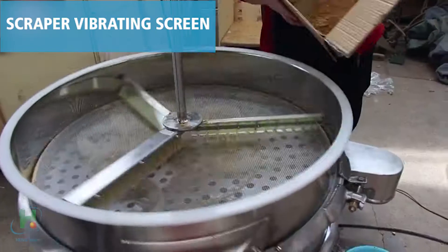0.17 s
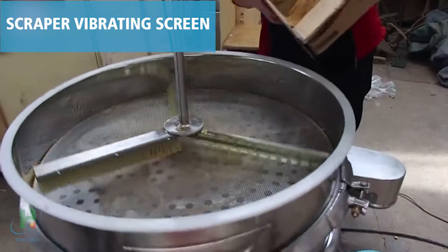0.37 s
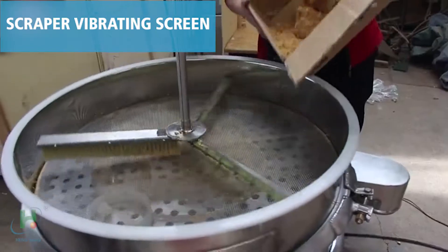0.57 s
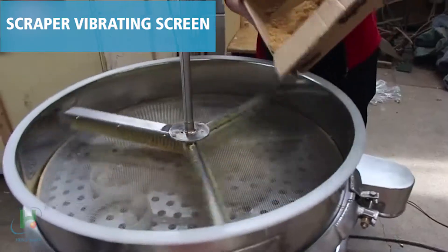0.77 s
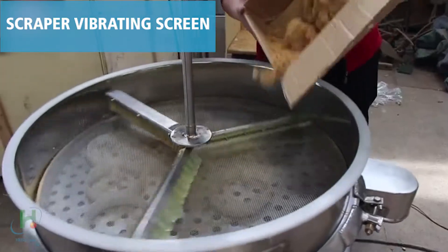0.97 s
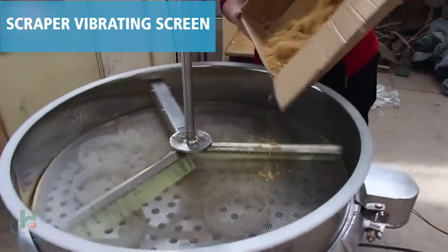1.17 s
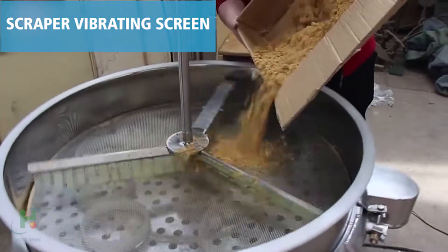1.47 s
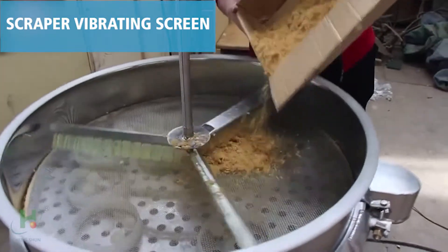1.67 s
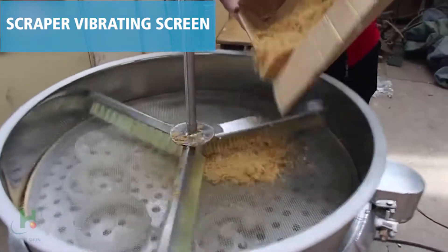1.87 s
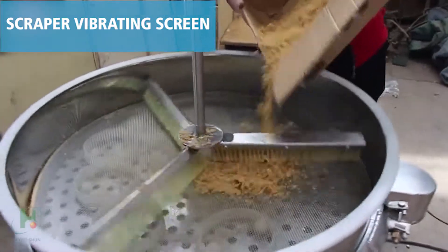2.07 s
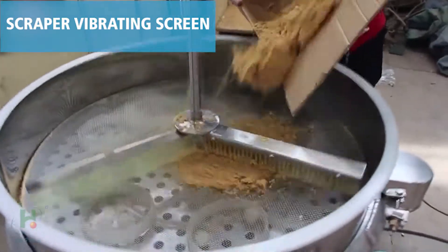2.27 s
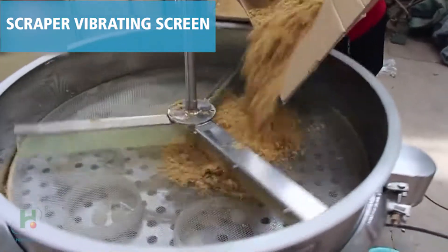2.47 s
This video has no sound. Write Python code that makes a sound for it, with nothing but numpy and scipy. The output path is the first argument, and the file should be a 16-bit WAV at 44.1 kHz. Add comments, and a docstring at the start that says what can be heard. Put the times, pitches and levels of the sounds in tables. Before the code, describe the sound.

Vibrating sieve machine rumbling steadily indoors, its steel drum humming while loose parts rattle and grains hiss

```python
"""Indoors, a round vibrating sieve runs close to a pair of microphone ports; its sound starts abruptly.
Its unbalanced motor shakes the steel drum about 25 times a second, a faint deep sine.
Dense knocks make the drum rumble in its low modes, with a wavering tone and a few heavier blows on top.
Brush and mesh hiss as dense, filtered grit. Short rattles of loose parts and a few longer swells
of pouring grains are bursts of ticks, many of them about a whole number of shaft turns apart."""
import sys
import numpy as np
from scipy import signal
from scipy.fft import rfft, irfft
from scipy.io import wavfile
from scipy.ndimage import uniform_filter1d, minimum_filter1d

SR = 44100
rng = np.random.default_rng(int(sys.argv[2]) if len(sys.argv) > 2 else 0)


def wav_out(sig):
    """Save sig, one row per channel (or a flat mono array), as 16-bit PCM at SR to the path in sys.argv[1]."""
    wavfile.write(sys.argv[1], SR, np.round(np.clip(np.atleast_2d(sig).T, -1, 1) * 32767).astype(np.int16))


N = 115983

# Rumble of the drum over time. Each row: time in seconds, level in dB.
RUMBLE_LEVEL = [(.13, -18.5), (.5, -18), (.9, -17.5), (1.3, -18), (1.55, -19), (1.7, -17.5), (2.1, -18),
                (2.35, -19), (2.63, -20.5)]
# Broad colour of the drum. Each row: frequency in Hz, gain in dB.
DRUM_COLOUR = [(20, -35.5), (60, -30), (95, -35), (105, -29), (125, -15.5), (250, -13.5), (390, -12),
               (600, -10), (700, -21.5), (1100, -29), (1600, -37.5), (4000, -74)]
# Resonances of the drum. Each row: frequency in Hz, width in Hz, gain in dB.
DRUM_MODES = [(128.4, 17, -7.5), (158.5, 25.6, -5.5), (201.1, 23, -5), (233.7, 17, -7), (251.7, 10.4, -3),
              (311.9, 18, -1), (340, 27.7, 0), (425.4, 21, -6), (492.6, 20, -8), (534.5, 39, -8.5),
              (600, 37, -8), (784, 16, -15.5), (873, 15, -24.5)]
# Sustained tone over time. Each row: time in seconds, level in dB on top of the rumble and TONE_DB.
TONE_LEVEL = [(.13, 0), (.4, 0), (.6, 5.5), (.8, -3.5), (1.1, -1.5), (1.45, -8), (1.7, 0), (1.95, 3),
              (2.15, 0.5), (2.4, 2), (2.63, -1.5)]
# Heavier blows on the drum. Each row: start in seconds, level in dB before the soft onset, ring in Hz.
THUMPS_ON_DRUM = [(0.345, -11.5, 165.4), (0.67, -14, 174), (0.845, -12, 438), (0.941, -10.5, 156),
                  (1.085, -14.5, 528), (2.048, -10.5, 531), (2.385, -15.5, 171)]
# Brush and mesh hiss over time. Each row: time in seconds, level in dB before HISS_TRIM_DB,
# gain in dB of the treble above FIZZ_HZ.
HISS_LEVEL = [(.13, -32, 5.5), (.25, -28, -2), (.32, -31, -0.5), (.4, -29, 0), (.66, -33, -1),
              (.85, -28.5, -2), (1.0, -34, 0), (1.1, -31, 1), (1.45, -33, -2), (1.7, -32, 0),
              (2.1, -34.5, -0.5), (2.27, -34.5, 6.5), (2.4, -38, 3.5), (2.63, -35.5, 2.5)]
# Broad colour of the hiss. Each row: frequency in Hz, gain in dB.
MESH_COLOUR = [(410, -15.5), (700, 4.5), (782, 2), (863, -2), (1530, -16.5), (1930, -17.5), (2570, -24),
               (4710, -32), (6070, -39), (8540, -40.5), (9750, -46.5)]
# Resonances of the mesh. Each row: frequency in Hz, width in Hz, lift in dB.
MESH_RINGS = [(1278, 58, 3), (1960, 270, 3), (4800, 24, 8.5), (6570, 160, 4.5)]
# Short rattles of loose parts and a few longer swells of pouring grains. Each row: start in seconds,
# level in dB before BURST_TRIM_DB, ring in Hz, ring gain in dB, treble in dB before TREBLE_LIFT_DB,
# time in seconds to fall by 60 dB.
RATTLES_AND_POURS = [(0.1273, -38, 3300, 3, -10, 0.025), (0.1987, -40, 3960, -2, -16, 0.068),
                     (0.248, -29, 3380, -9, -27, 0.033), (0.3668, -30, 3960, -3, -23.5, 0.065),
                     (0.492, -32.5, 3800, 5, -22, 0.02), (0.5298, -32.5, 5840, 14, -30, 0.033),
                     (0.5689, -30.5, 3660, -1, -23, 0.029), (0.6095, -34, 4570, 3, -18, 0.045),
                     (0.691, -38, 4000, 6, -17, 0.046), (0.7564, -34, 4190, -8, -22, 0.066),
                     (0.933, -39.5, 3570, 11, -15, 0.066), (0.9795, -35, 3540, 14, -18, 0.023),
                     (1.032, -35, 4330, 7, -36, 0.18), (1.209, -37, 4040, 14, -13, 0.05),
                     (1.2891, -32, 3200, -4, -16, 0.065), (1.3275, -38, 4000, 8, -20, 0.1),
                     (1.3715, -36.5, 3800, 4, -22, 0.032), (1.4074, -33.5, 3870, -4, -21, 0.041),
                     (1.4914, -36, 3310, 0, -20, 0.022), (1.5723, -35, 3630, -12, -27, 0.033),
                     (1.613, -30, 3220, -18, -22.5, 0.061), (1.6569, -34.5, 3260, 8, -12, 0.034),
                     (1.7312, -31, 3700, -3, -13, 0.05), (1.808, -35, 4000, 9, -13, 0.13),
                     (1.889, -34.5, 4280, -1, -22, 0.052), (1.9343, -35, 3340, -1, -25, 0.049),
                     (1.9732, -37, 3250, 8, -22, 0.041), (2.0144, -31.5, 3250, -4, -17, 0.037),
                     (2.0584, -36.5, 3200, 9, -26, 0.028), (2.1337, -37.5, 3170, -4, -21.5, 0.14),
                     (2.2153, -36, 5300, 2, -20, 0.1), (2.297, -40, 4600, 0, -14, 0.025),
                     (2.3313, -32.5, 4770, -2, -20, 0.026), (2.4963, -41.5, 3920, 11, -28, 0.17)]
# Colour of every rattle and pour below its treble. Each row: frequency in Hz, gain in dB.
BURST_COLOUR = [(600, -17), (1500, -2.5), (2200, 3.5), (4000, -0.5), (5500, -2.5)]
# Likeness of the two ports for a rattle or pour. Each row: frequency in Hz, share from 0 to 1.
BURST_LIKENESS = [(2500, .9), (5000, .7), (7500, .9)]
# Likeness of the two ports for the rumble, hiss, tone and blows. Each row: frequency in Hz, share from 0 to 1.
PORT_LIKENESS = [(20, .3), (64, .55), (105, .96), (150, .99), (600, .96), (1000, .93), (1400, .95),
                 (2300, .8), (4500, .62), (6200, .68), (7000, .985)]
# Balance of the ports. Each row: frequency in Hz, left gain over right in dB.
PORT_BALANCE = [(20, 1.4), (64, -.5), (107, -2.8), (230, -5.5), (550, -6.3), (860, -4), (1600, -1.5),
                (3000, 0), (9300, 0)]
# Phase lead of the left port. Each row: frequency in Hz, lead in radians.
PORT_LEAD = [(20, -1), (107, -1), (236, -.5), (410, -.17), (600, .08), (1030, .24), (1550, .03), (4130, .3)]

START_S, FADE_IN_S = .1283, .0024
SHAFT_HZ, SHAKE_DB = 24.63, -58.5
KNOCKS_PER_S, KNOCK_SPREAD_DB = 4000, 1.5
TONE_HZ, TONE_WANDER_HZ, TONE_DB = 329.3, 9.86, -9  # wander is RMS
TONE_THROB, TONE_PEAK_TURN = 0.15, 0.79  # depth, place of the peak in each turn (0 to 1)
THUMP_RISE_S, THUMP_T60_S = .01, 0.24
GRIT_PER_S, GRIT_SPREAD_DB = 12000, 1.5
HISS_THROB, HISS_PEAK_TURN = 0.12, 0.19
HISS_PATCH_DB, HISS_TRIM_DB = 2, 2.5
FIZZ_HZ, MESH_LOW_CUT_HZ = 3500, 755.0
TICKS_PER_S, TICK_SPREAD_DB, BURST_TRIM_DB = 7000, 0.81, -5
BURST_RISE_S, RING_WIDTH_HZ = .002, 330
BURST_CUTOFF = 1.27  # exponent over 1: the burst holds, then falls ever faster
TREBLE_HZ, TREBLE_LIFT_DB = 6900, 12
LIMIT_DB, LIMIT_SHARE, RECOVER_DB_PER_S = -6, 0.75, 148
EDGE_HZ = 9660


def amp(db):
    """Turns dB into a gain."""
    return 10 ** (np.asarray(db) / 20)


def evened(x):
    """Brings a signal to an RMS of one."""
    return x / np.sqrt(np.mean(x ** 2) + 1e-20)


def read(points, hz):
    """Reads a colour curve along a logarithmic frequency scale."""
    f, value = np.transpose(points)
    return np.interp(np.log(hz + 1), np.log(f + 1), value)


def level(curve, column=1):
    """Draws a dB column over time as a gain."""
    rows = np.transpose(curve)
    return amp(np.interp(np.arange(N) / SR, rows[0], rows[column]))


def knocks(shape, per_s, spread_db):
    """Scattered single-sample clicks of random sign and uneven size."""
    size = amp(spread_db * np.minimum(rng.exponential(1, shape), 4))
    struck = rng.random(shape) < per_s / SR
    return size * rng.standard_normal(shape) * struck


def throb(depth, peak_turn):
    """Strength swelling once in each turn of the shaft."""
    turns = SHAFT_HZ * np.arange(N) / SR
    return 1 + depth * np.cos(2 * np.pi * (turns - peak_turn))


def ports(pair, gain):
    """Colours two drives, spreads them over the ports and sets the RMS of their mean to one."""
    hz = np.fft.rfftfreq(N, 1 / SR)
    a, b = rfft(pair, axis=1)
    same = read(PORT_LIKENESS, hz)
    side = amp(read(PORT_BALANCE, hz) / 2)
    left = a * side * np.exp(1j * read(PORT_LEAD, hz))
    right = (same * a + np.sqrt(1 - same ** 2) * b) / side
    out = irfft(np.array([left, right]) * gain, N, axis=1)
    return out / np.sqrt(np.mean(out.mean(0) ** 2))


def shake():
    """The unbalanced motor shakes the body: a sine at shaft speed, stronger on the left."""
    t = np.arange(N) / SR
    sine = np.sqrt(2) * np.sin(2 * np.pi * SHAFT_HZ * t)
    return amp(SHAKE_DB) * sine * amp([[3.], [-3.]])


def mesh():
    """Bristles on the mesh: dense grit that throbs with the shaft and drifts in patches."""
    hz = np.fft.rfftfreq(N, 1 / SR)
    grit = knocks((2, N), GRIT_PER_S, GRIT_SPREAD_DB) * throb(HISS_THROB, HISS_PEAK_TURN)

    # Smooth random gains over time and frequency, shared by both drives
    z = signal.stft(grit, nperseg=512, noverlap=384)[2]
    patches = rng.standard_normal(z.shape[:0:-1])
    patches = uniform_filter1d(patches, size=8, axis=0)
    patches = uniform_filter1d(patches, size=3, axis=1)
    patchy = z * amp(HISS_PATCH_DB * evened(patches.T))
    grit = signal.istft(patchy, nperseg=512, noverlap=384)[1][:, :N]

    fizz = irfft(rfft(grit, axis=1) / (1 + (FIZZ_HZ / (hz + 1)) ** 6), N, axis=1)
    grit = grit + fizz * (level(HISS_LEVEL, column=2) - 1)
    lift_db = sum(db / (1 + (2 * (hz - f) / width) ** 2) for f, width, db in MESH_RINGS)
    low_cut = 1 / (1 + (MESH_LOW_CUT_HZ / (hz + 1)) ** 4)
    hiss = ports(grit, amp(read(MESH_COLOUR, hz) + lift_db) * low_cut)
    return amp(HISS_TRIM_DB) * level(HISS_LEVEL) * hiss


def rattles_and_pours():
    """Loose parts and pouring grains: bursts of ticks, each with its own ring, brightness and length."""
    length = 4096
    out, t = np.zeros((2, N + length)), np.arange(length) / SR
    hz = np.fft.rfftfreq(length, 1 / SR)
    same = read(BURST_LIKENESS, hz)
    for start, db, ring_hz, ring_db, treble_db, t60 in RATTLES_AND_POURS:
        fall = amp(-60 * (t / t60) ** BURST_CUTOFF)
        shape = (1 - np.exp(-t / BURST_RISE_S)) * fall
        ticks = knocks((2, length), TICKS_PER_S, TICK_SPREAD_DB) * shape
        colour = amp(read(BURST_COLOUR + [(TREBLE_HZ, treble_db + TREBLE_LIFT_DB)], hz))
        ring = amp(ring_db) / (1 + 2j * (hz - ring_hz) / RING_WIDTH_HZ)
        a, b = rfft(ticks, axis=1)
        both = np.array([a, same * a + np.sqrt(1 - same ** 2) * b])
        pair = irfft(both * colour * (1 + ring), length, axis=1)
        pair = pair / np.sqrt(np.mean(pair[:, :300] ** 2))  # levelled by its onset
        at = round(start * SR)
        out[:, at:at + length] += amp(db + BURST_TRIM_DB) * pair
    return out[:, :N]


def thumps():
    """A soft blow swells one ring of the drum, which then dies away."""
    x, t = np.zeros(N + 8192), np.arange(8192) / SR
    for start, db, hz in THUMPS_ON_DRUM:
        swell = amp(db - 60 * t / THUMP_T60_S) * (1 - np.exp(-t / THUMP_RISE_S))
        x[round(start * SR):][:8192] += swell * np.sin(2 * np.pi * hz * t)
    return ports(x[:N] * [[1], [0]], 1) * np.std(x[:N])


def tone():
    """The motor holds a strong mode singing: a throbbing cosine whose pitch wanders quickly."""
    wander = uniform_filter1d(rng.standard_normal(N), size=900)
    wander = evened(uniform_filter1d(wander, size=900))
    phase = 2 * np.pi * np.cumsum(TONE_HZ + TONE_WANDER_HZ * wander) / SR
    hum = np.cos(phase) * throb(TONE_THROB, TONE_PEAK_TURN)
    return amp(TONE_DB) * level(RUMBLE_LEVEL) * level(TONE_LEVEL) * ports(hum * [[1], [0]], 1)


def drum():
    """Dense knocks on the steel excite its broad colour and its low resonances."""
    hz = np.fft.rfftfreq(N, 1 / SR)
    power = amp(2 * read(DRUM_COLOUR, hz))
    for f, width, db in DRUM_MODES:
        power = power + amp(2 * db) / (1 + (2 * (hz - f) / width) ** 2) ** 2
    drive = knocks((2, N), KNOCKS_PER_S, KNOCK_SPREAD_DB)
    return level(RUMBLE_LEVEL) * ports(drive, np.sqrt(power))


def scene():
    """Sums the layers of the sieve and opens them abruptly."""
    opening = np.clip((np.arange(N) / SR - START_S) / FADE_IN_S, 0, 1)
    return (shake() + mesh() + rattles_and_pours() + thumps() + tone() + drum()) * opening


def record(dry):
    """A limiter takes back part of each peak's excess and recovers steadily; then a low-pass."""
    nearby_peak = -minimum_filter1d(-abs(dry).max(0), size=401)  # looks both ways in time
    peak_db = 20 * np.log10(nearby_peak + 1e-6)
    fall = np.arange(N) * RECOVER_DB_PER_S / SR
    held_peak_db = np.maximum.accumulate(peak_db + fall) - fall
    over_db = np.maximum(held_peak_db - LIMIT_DB, 0)
    held = dry / amp(LIMIT_SHARE * uniform_filter1d(over_db, size=300))
    low_pass = signal.firwin(1023, EDGE_HZ, window=("kaiser", 10), fs=SR)
    return signal.oaconvolve(held, low_pass[None], "same")


dry = scene()
out = record(dry)
wav_out(out)
```